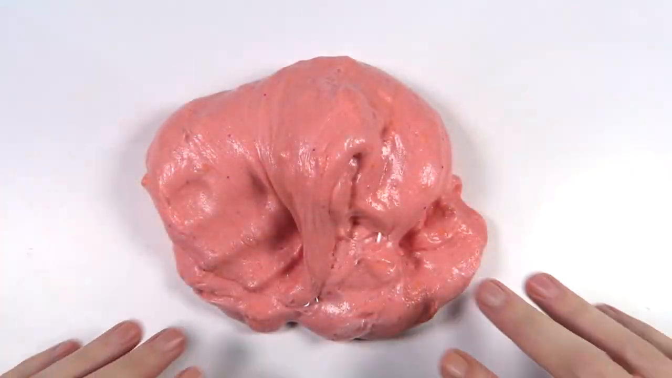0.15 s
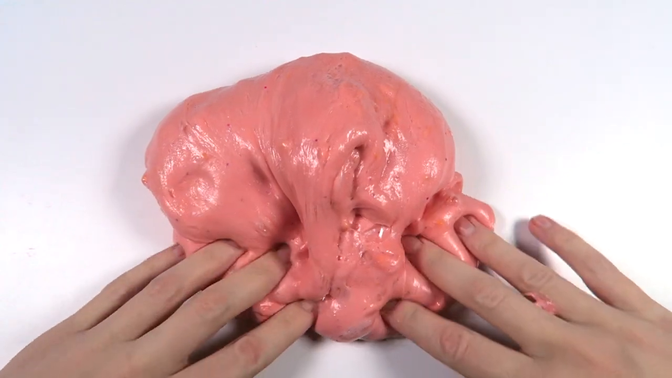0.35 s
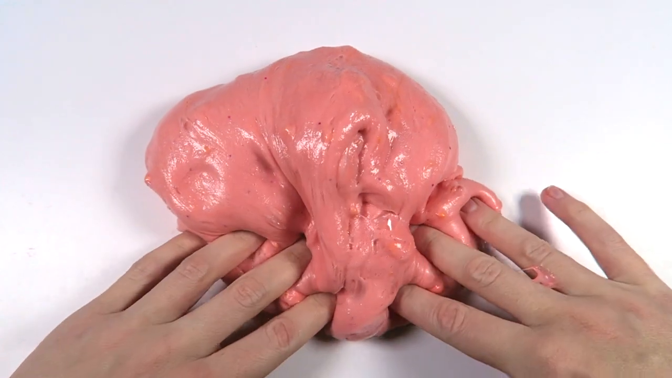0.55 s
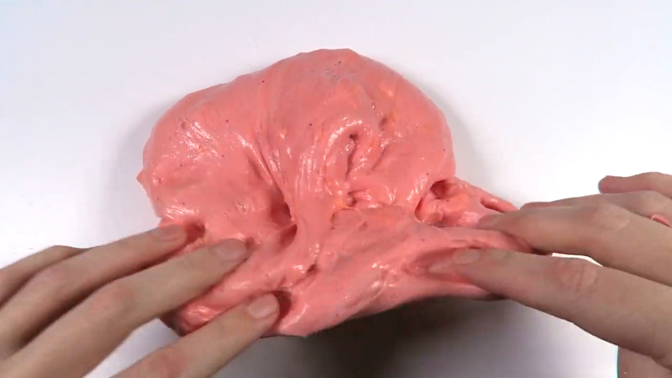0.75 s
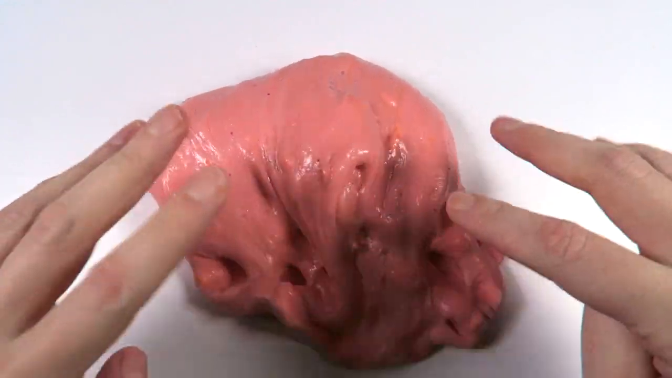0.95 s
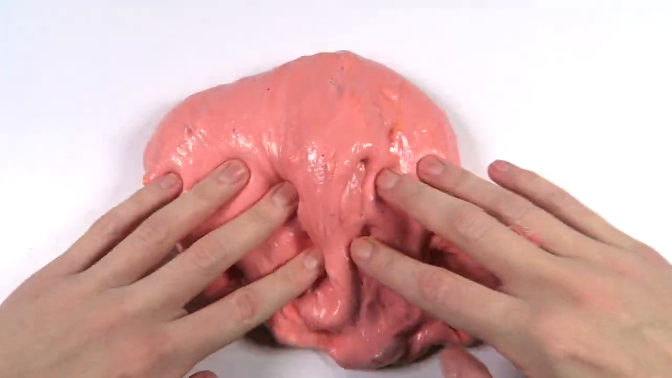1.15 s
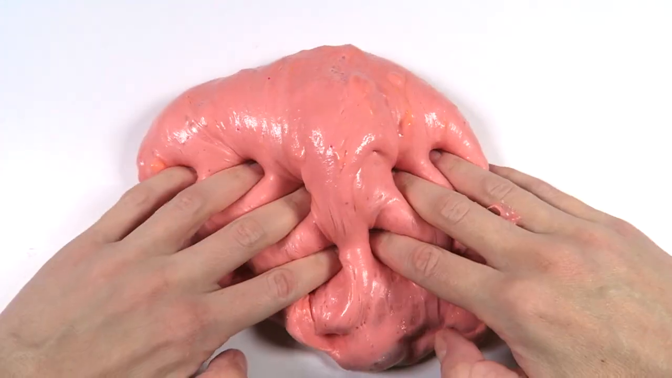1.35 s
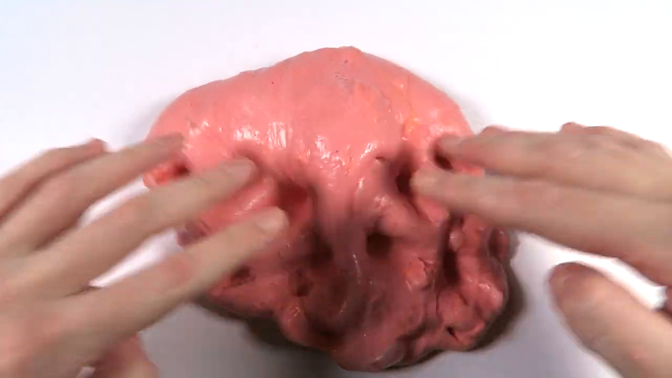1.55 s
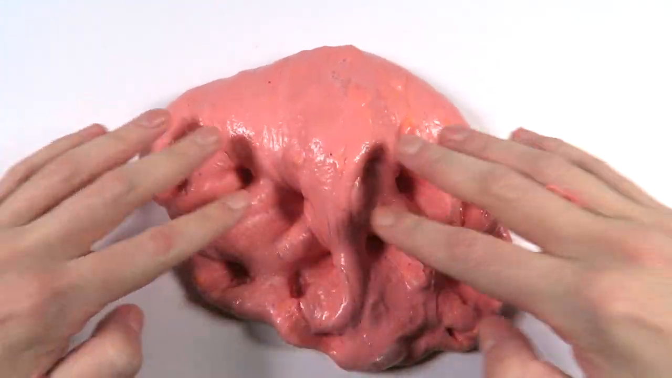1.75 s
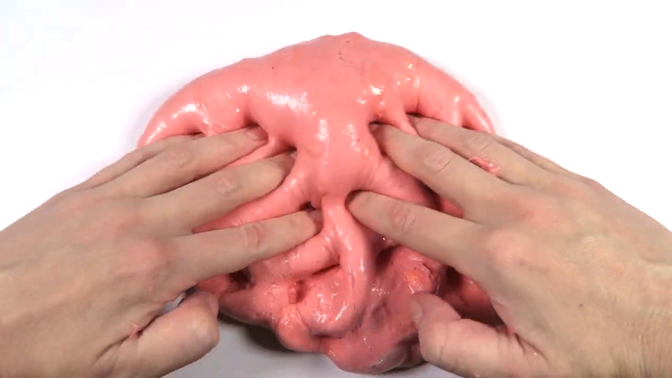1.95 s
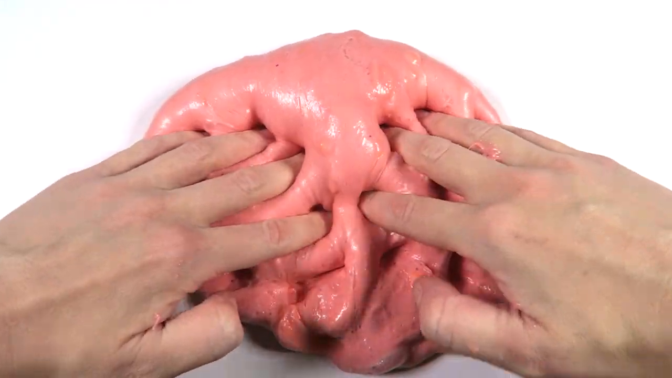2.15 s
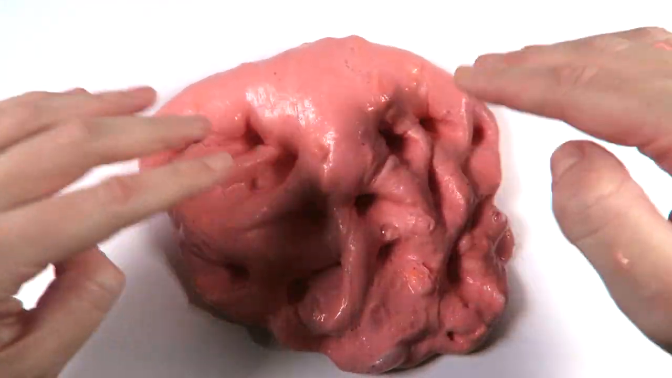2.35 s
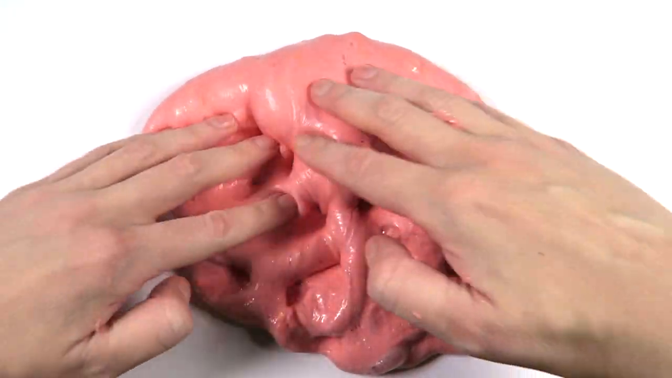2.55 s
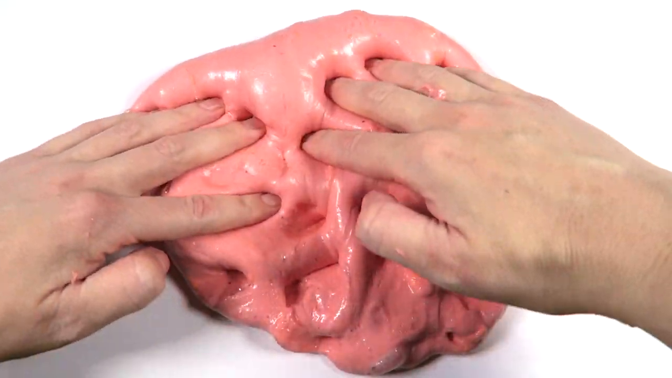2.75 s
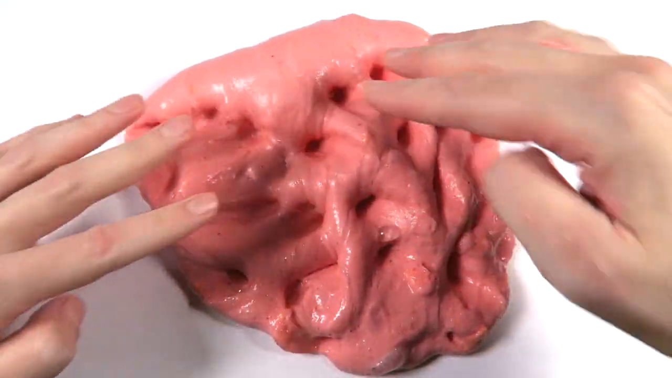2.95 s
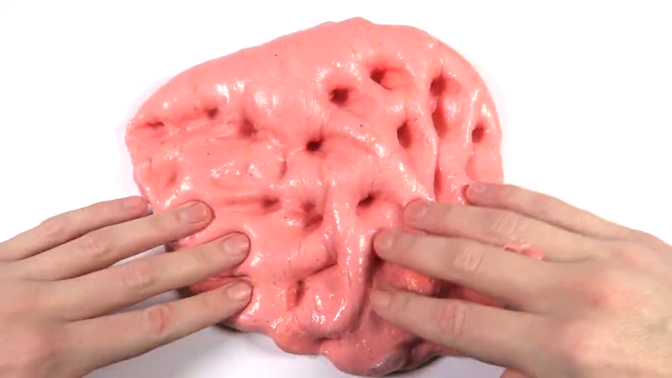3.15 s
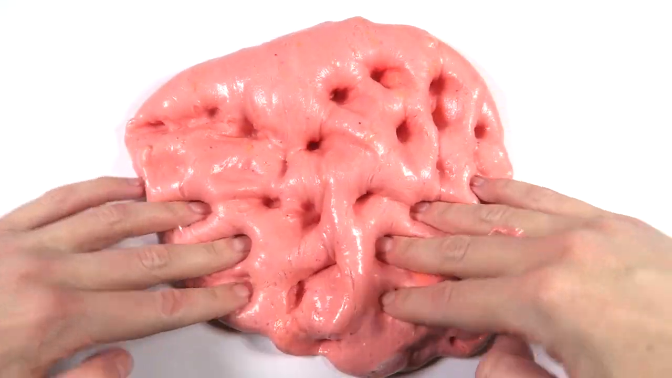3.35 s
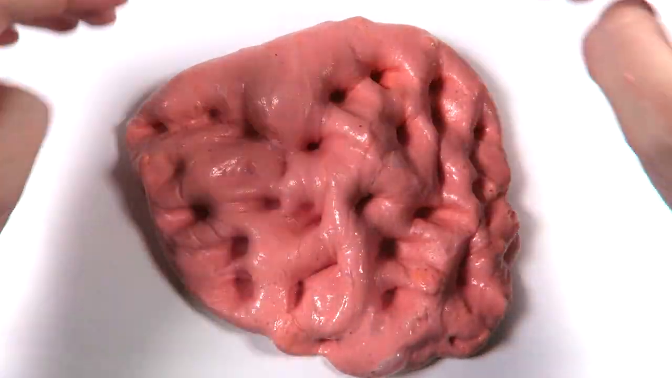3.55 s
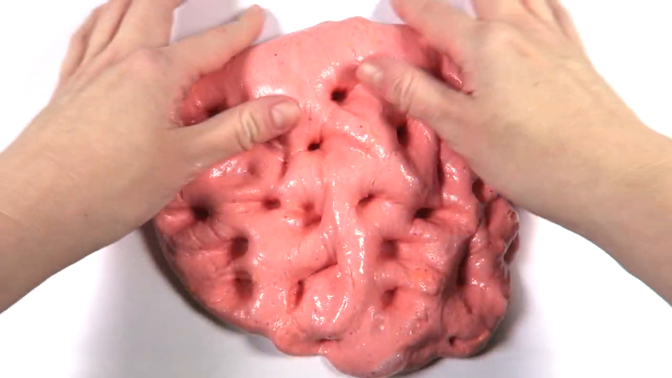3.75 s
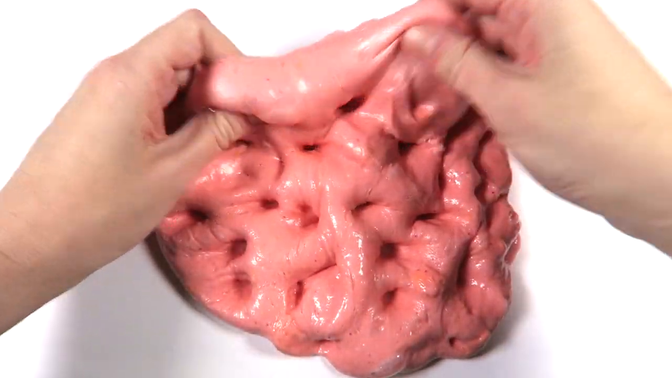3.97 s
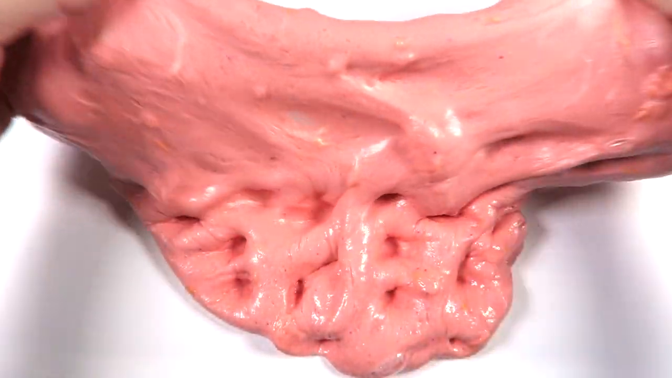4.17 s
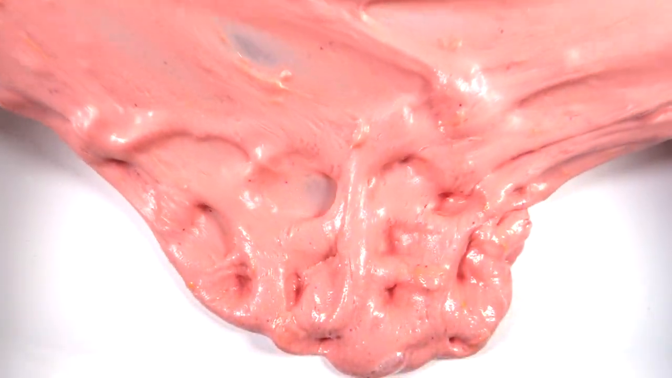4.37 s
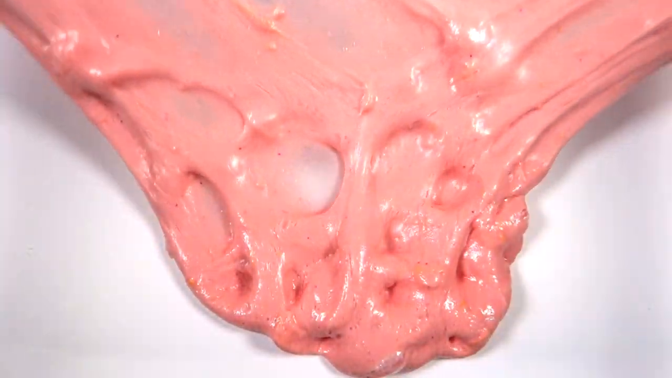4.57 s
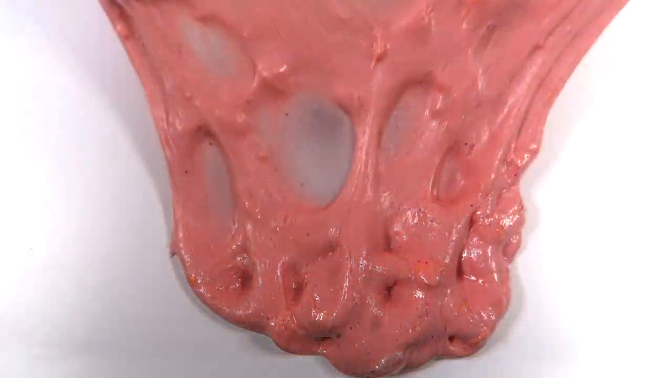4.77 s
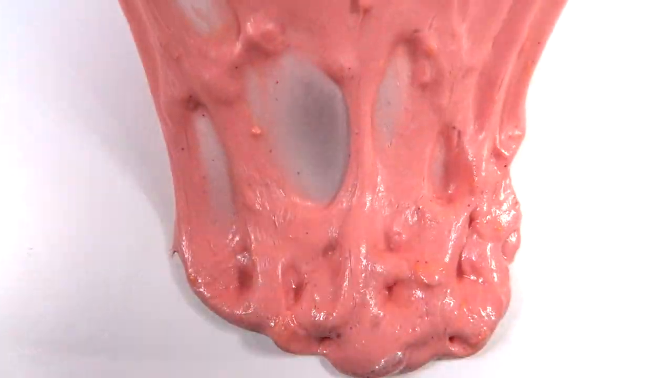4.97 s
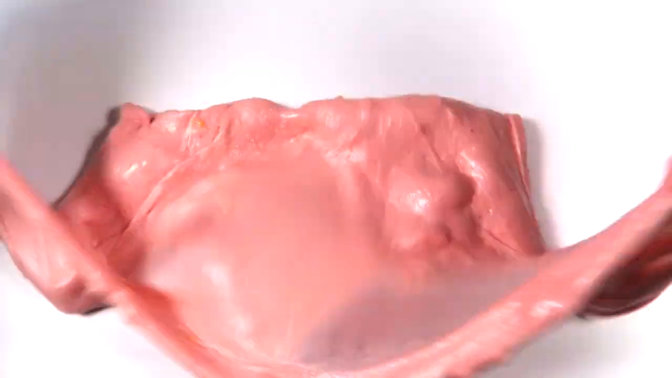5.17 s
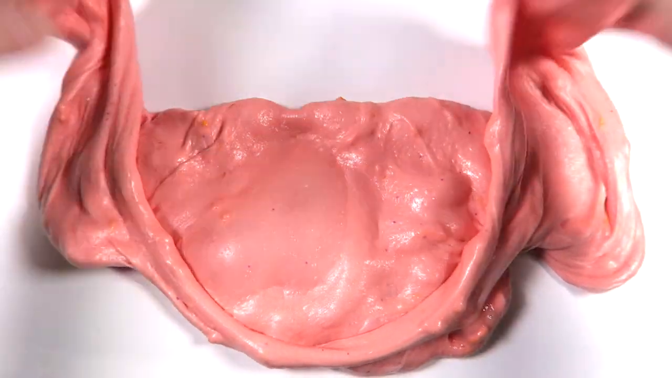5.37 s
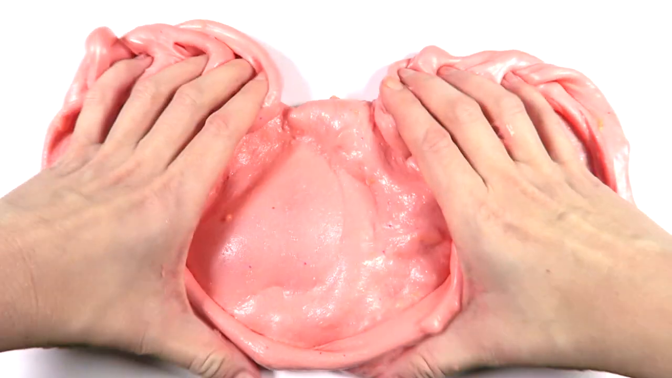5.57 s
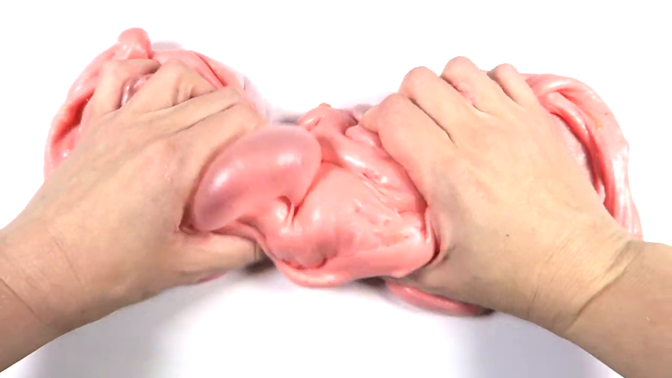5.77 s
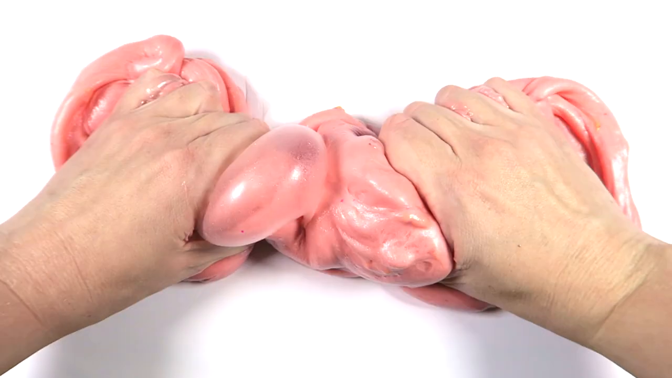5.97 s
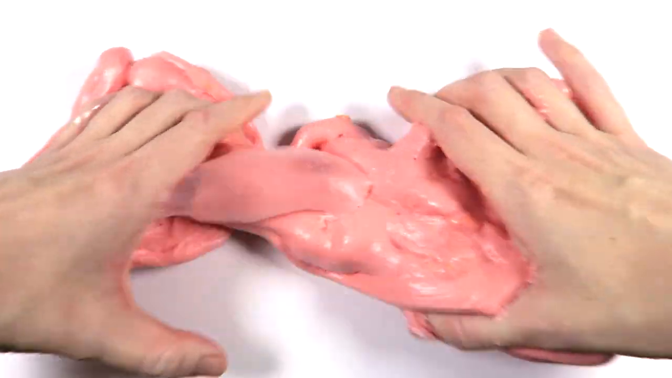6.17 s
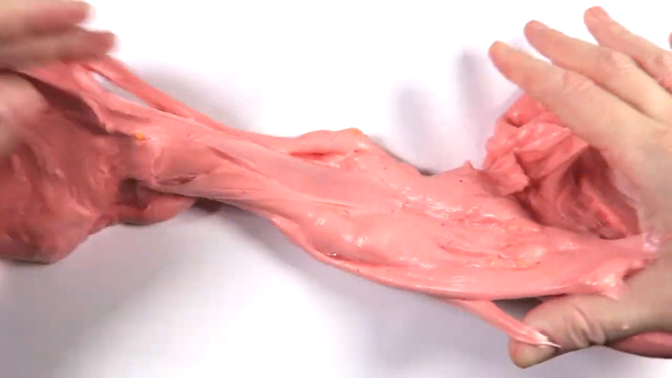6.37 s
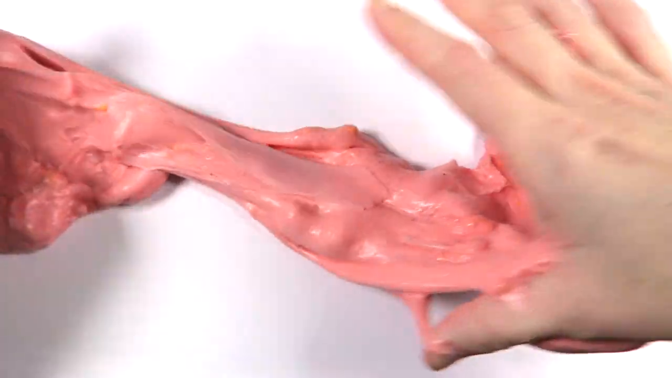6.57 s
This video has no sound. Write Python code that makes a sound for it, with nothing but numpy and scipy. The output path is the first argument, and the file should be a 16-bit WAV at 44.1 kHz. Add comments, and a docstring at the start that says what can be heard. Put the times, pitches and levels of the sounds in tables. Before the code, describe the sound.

Thick wet slime is poked and folded by hand up close, giving sharp bursts of snaps and hollow pops between short quiet gaps.

```python
"""Small quiet room: fingers poke, pull and fold thick slime on a table, close to a spaced microphone pair.
Films snap (shaped noise bursts), air pockets pop (rising damped sines) and ring the table top (modes),
bubbles crackle (random grains), a stretched fold squeaks (wavering tones), hands sway the table (low noise).
Near echoes and a short room tail follow; below lie room tone, hiss (shaped noise) and a brief faint hum.
"""
import sys
import numpy as np
from scipy import signal
from scipy.fft import rfft, irfft, next_fast_len
from scipy.io import wavfile
from scipy.ndimage import uniform_filter1d

SR = 44100
rng = np.random.default_rng(int(sys.argv[2]) if len(sys.argv) > 2 else 0)


def generate_wav(sig):
    """Save sig (samples, or channels by samples) to the path in sys.argv[1] as 16-bit PCM at SR."""
    pcm = np.round(np.clip(np.atleast_2d(sig).T, -1, 1) * 32767).astype(np.int16)
    wavfile.write(sys.argv[1], SR, pcm)


N = 291942

# films tearing: (t/s, body level at 1.8 kHz/dB per kHz, crack level at 5.5 kHz/dB per kHz,
#                 fall from crack to 12 kHz/dB, length/ms, left-right/dB)
FILM_TEARS = [(0.144, -70, -47.5, 6, 3.5, -2), (0.4497, -50, -44, 12, 3.1, -5.5),
              (0.5305, -39, -52, 2, 2.1, -5), (0.74, -32, -37.5, 7, 13, -7.5),
              (0.761, -12, -7.5, 16, 1.3, -4.5), (0.7748, -10.5, -6, 33, 3.1, 11),
              (0.778, -3, -1.5, 16.5, 1.1, -3), (0.7803, -18, -12, 8, 0.85, 11.5),
              (0.992, -35, -34.5, 24, 2.9, -6), (1.033, -49, -35, 30, 1.3, 3.5),
              (1.075, -19.5, -39, 0, 2.8, 3), (1.0792, -29, -35, 23, 0.61, -8.5),
              (1.4323, -42.5, -35, 9, 1.6, 5), (1.576, -25, -44, 18, 1.3, -9.5),
              (1.5897, -17, -34, 22, 2.6, 2), (1.62, -6, -11, 14, 2.2, -1),
              (1.6348, -14.5, -2.5, 9.5, 4, -6), (1.6486, -13.5, -10, 7, 15, 8.5),
              (1.6564, -13, -17, 22, 0.61, -2.5), (2.3262, -10.5, -12, 6.5, 0.9, -4),
              (2.34, -15, -23, 1.5, 2.8, -12.5), (2.3538, -4.5, -8, 3, 4.5, -4.5),
              (2.3711, -1.5, -8, 4.5, 0.92, -3.5), (2.3797, -30, -2.5, 21, 4.1, 3),
              (2.387, -5, -18, -8, 0.61, 5.5), (2.666, -32.5, -45.5, 13, 2.7, -8),
              (2.7256, -32.5, -34.5, 1, 0.4, 1), (2.9724, -13, -20.5, 9, 1.9, -15),
              (2.9862, -23, -19, 10, 2.9, 3.5), (3.0078, -16, -22.5, -2, 4.4, -4.5),
              (3.0149, -16, -13.5, 15, 0.6, 13), (3.0196, -10.5, -7.5, 22, 2.5, -5.5),
              (3.0241, -19, -22.5, -4, 0.64, 8.5), (3.3163, -14, -11.5, 29, 0.59, -1.5),
              (3.5156, -21, -15.5, 5, 0.36, -5), (3.5385, -19, -23.5, 6, 3.8, -9),
              (3.5456, -17.5, -22.5, 7, 2.7, 11), (3.9385, -47, -46, -3, 2.5, 4.5),
              (3.9641, -36, -49, -7, 1.4, -0.5), (4.1336, -27.5, -32, 8, 0.22, -8.5),
              (4.1581, -68, -24, 16, 0.67, 2.5), (4.1829, -23.5, -36, 2, 0.48, -4),
              (4.212, -33, -42, 4, 1.3, -1.5), (4.2704, -41, -35, 15, 0.49, -5),
              (4.2836, -37, -33, 7, 3.1, -12.5), (4.385, -42, -40, 10, 1.3, -5.5),
              (4.3927, -36.5, -39.5, 10, 0.36, -4.5), (5.0807, -57, -48, 0, 1.3, -5),
              (5.228, -29.5, -38.5, 12, 2.4, -11.5), (5.243, -36, -53, 11, 1.4, -5),
              (5.2617, -34, -47, 14, 2.4, -4), (5.2953, -2, -8, 20, 0.56, -7),
              (5.3294, -12, -17, 12, 4.8, 4.5), (5.6417, -39, -49, 3, 1.5, -11),
              (5.6665, -29, -48, 12, 2.9, -3), (5.7147, -45, -39, 21, 3.8, -4.5),
              (5.7758, -27, -28.5, 25, 8.5, -6.5), (5.8, -27, -29, 33, 4.3, -1),
              (5.8795, -3.5, -17.5, 15, 0.64, -2), (5.8933, -22, -38, 25, 2.3, 8.5),
              (5.9304, -25, -29, 8, 2.1, 8.5), (5.94, -9, -11, 13, 0.35, -8),
              (5.9596, -22, -21, 16, 1.9, 7), (5.9671, -22, -14.5, -5.5, 0.73, -1.5),
              (5.9894, -9, -15.5, 10, 5.7, 6), (6.0016, -6.5, -12, 7, 2.5, -1),
              (6.0658, -24, -25.5, -3, 0.4, 4), (6.1836, -17, -30, 16, 8.9, -0.5),
              (6.1964, -10, -25, 21, 0.39, -14), (6.203, -5.5, -25, 20, 1.8, -4.5),
              (6.2597, -26, -21, 15, 0.87, 12), (6.2674, -7, -37, 9, 0.62, -1),
              (6.2873, -7, -24, 16, 1.7, -1.5), (6.3654, -35, -40, -4, 0.9, 6.5)]
SNAP_BASS_DB = -5  # 800 Hz against the body
LAG_MS_PER_DB = 0.1  # louder side lags


def snaps():
    """Each tear is a spiky noise burst, whitened, then coloured; it dies within milliseconds."""
    size = 1024
    out = np.zeros((2, N))
    t = np.arange(size) / SR
    hz = np.fft.rfftfreq(size, 1 / SR)
    shape = (len(FILM_TEARS), size)
    cracks = rng.standard_normal(shape) * gain_of(4.9 * rng.standard_normal(shape))
    for (s, body_db, crack_db, fall_db, length_ms, pan_db), crack in zip(FILM_TEARS, cracks):
        burst = rfft(crack * np.exp(-(1000 * t / length_ms) ** 2))
        whiten_db = -10 * np.log10(uniform_filter1d(abs(burst) ** 2, size=13) + 1e-9)
        low_db, top_db = body_db + SNAP_BASS_DB, crack_db - fall_db
        colour = [(250, low_db - 14), (800, low_db), (1800, body_db),
                  (3200, (body_db + crack_db) / 2 + 0.5), (5500, crack_db), (7500, crack_db),
                  (12000, top_db), (16000, top_db - 8)]
        per_khz_to_bin_db = 10 * np.log10(SR / 2000)
        gain_db = whiten_db + read(colour, hz) + per_khz_to_bin_db
        add(out, s, irfft(burst * causal(gain_db, size)), pan_db, LAG_MS_PER_DB * pan_db)
    return out


# air pockets bursting: (t/s, level/dB, starting f/Hz, left-right/dB)
AIR_POCKETS = [(0.53, -44.5, 320, -3), (0.758, -12, 595, -1.5), (0.762, -17, 223, 13),
               (0.768, -20.5, 385, -6), (0.775, -11, 1440, -4), (0.778, -29, 180, 6), (0.785, -30, 396, 9),
               (1.073, -25, 310, 0), (1.074, -33, 1100, -2), (1.079, -38, 410, -2), (1.101, -48, 535, 3.5),
               (1.576, -27.5, 416, -8), (1.586, -18.5, 450, -7), (1.601, -25.5, 453, 9),
               (1.613, -19, 540, -8), (1.654, -4.5, 313, 3), (1.665, -14.5, 360, 2),
               (1.698, -25, 416, -1.5), (1.741, -27.5, 480, -1), (2.323, -18, 1120, -3),
               (2.323, -23.5, 484, -5), (2.353, -11.5, 754, 1), (2.357, -13.5, 326, -7),
               (2.362, -12.5, 390, -7), (2.368, -14, 427, -2.5), (2.377, -22.5, 233, 10),
               (2.721, -43.5, 460, -14), (2.97, -18.5, 277, -7), (3.005, -20.5, 930, -5),
               (3.022, -21, 536, 9), (3.313, -33, 1280, 7), (3.315, -26, 296, -4), (3.502, -22, 980, -7),
               (3.51, -20, 510, -8), (3.515, -17, 940, -3), (3.519, -25, 171, 6), (3.541, -24.5, 301, 9),
               (3.546, -22, 395, -15), (3.571, -39, 363, 4), (4.128, -37, 790, -1), (4.185, -39, 400, -6),
               (4.251, -41, 523, 2.5), (4.29, -38, 765, -3), (5.218, -38, 805, -7), (5.262, -44, 860, -4),
               (5.293, -8.5, 1703, -3), (5.32, -36, 1500, 9), (5.361, -36, 217, 3),
               (5.876, -26.5, 420, -12), (5.935, -28.5, 690, -7), (5.938, -23, 230, -3),
               (5.971, -15.5, 1460, -3), (5.996, -13, 332, -5), (5.998, -17.5, 990, -3),
               (6.195, -19.5, 400, -10), (6.22, -27, 1390, 9), (6.266, -25.5, 510, -9),
               (6.285, -19.5, 614, -2), (6.61, -31, 1930, -15)]
POP_T60_S, POP_SIZE_LAW = 0.014, 0.2  # T60 at 400 Hz; higher pockets die sooner


def pops():
    """A pocket rings a few uneven cycles; its pitch rises as the hole opens."""
    out, t = np.zeros((2, N)), np.arange(3000) / SR
    wobbles = uniform_filter1d(rng.standard_normal((len(AIR_POCKETS), len(t))), size=40)
    for (s, db, hz, pan_db), wobble in zip(AIR_POCKETS, wobbles):
        t60_s = POP_T60_S * (400 / hz) ** POP_SIZE_LAW
        turns = np.cumsum(hz * (1 + 0.21 * t / t60_s + 1.14 * wobble)) / SR
        overtone = min(120 / hz, 0.5)  # soft wall of a large pocket skews each cycle
        wave = np.sin(2 * np.pi * turns) + overtone * np.sin(4 * np.pi * turns)
        ring = wave * (1 - np.exp(-t / 0.00028)) * gain_of(db - 60 * t / t60_s)
        add(out, s + 0.002503, ring, pan_db, 0)  # ring builds just after the skin gives
    return out


# slime stretching: (peak t/s, swell/s, fade/s, wet squelch level/dB, large bubble level/dB,
#                    fine bubble level/dB)
STRETCHES = [(0.47, .1, 0.36, -91, -78, -77), (0.97, 0.3, 0.26, -63, -60, -58.5),
             (1.611, 0.057, .03, -56.5, -45, -50), (1.7, 0.15, 0.088, -37.5, -72, -47),
             (2.449, 0.12, .04, -37.5, -39, -68), (2.7, 0.2, 0.17, -64.5, -71, -71),
             (3.09, 0.18, 0.051, -44.5, -70, -66), (3.6, 0.11, 0.047, -45.5, -53, -58),
             (3.98, 0.21, 0.27, -70, -59.5, -67.5), (4.23, 0.36, 0.23, -52.5, -62, -52.5),
             (5.261, 0.15, 0.098, -52.5, -52.5, -55.5), (5.32, 0.021, 0.039, -31, -59, -63),
             (5.821, 0.36, 0.3, -47, -49, -47), (5.952, 0.037, 0.24, -37, -44, -38),
             (6.19, .02, 0.12, -41, -38, -42.5), (6.28, 0.21, 0.34, -51.5, -51, -47),
             (6.61, 0.046, 0.14, -55.5, -62, -56.5)]
# squelch, large, fine grains: (low f/Hz, high f/Hz, decay/cycles, rate/per s)
BUBBLE_GRAINS = [(180, 913, 1.94, 400), (958, 3010, 12.3, 500), (2900, 9300, 0.8, 4000)]
STRETCH_EDGE_DB = 27.5  # drop one swell before or one fade after the peak


def crackle():
    """Random decaying sine grains in three size bands follow the strength of each stretch."""
    out = np.zeros((2, N))
    moves = np.array([peak(s, 0, STRETCH_EDGE_DB / swell_s, STRETCH_EDGE_DB / fade_s)
                      for s, swell_s, fade_s, *_ in STRETCHES])
    for column, (lo_hz, hi_hz, cycles, per_s) in enumerate(BUBBLE_GRAINS, 3):
        layer = np.zeros((2, N))
        size = gain_of(6.1 * np.minimum(rng.exponential(1, N), 3))
        hits = size * (rng.random(N) < per_s / SR) * rng.choice([-1, 1], N)
        pitch_index = rng.integers(0, 16, size=N)
        for k, hz in enumerate(np.geomspace(lo_hz, hi_hz, num=16)):
            turns = np.arange(int(4 * cycles * SR / hz)) * hz / SR
            grain = np.sin(2 * np.pi * turns) * np.exp(-2 * turns / cycles)
            grain /= np.linalg.norm(grain)
            train = signal.oaconvolve(hits * (pitch_index == k), grain)
            add(layer, 0.001, train, -3.0, rng.uniform(-0.25, 0.28))  # one lag per pitch
        strength = gain_of(np.array(STRETCHES)[:, column]) @ moves
        out += evened(layer) * strength
    return out


# air leaving a stretched fold: (start t/s, end t/s, start f/Hz, end f/Hz, level/dB)
FOLD_SQUEAKS = [(4.015, 4.078, 1780, 1910, -59), (4.03, 4.055, 1956, 3160, -59),
                (4.04, 4.078, 2900, 2900, -64.5), (4.087, 4.118, 1290, 1275, -58.5)]


def squeaks():
    """Air squeaks out of a stretched fold as gliding tones of fast-wavering strength."""
    return whistles(FOLD_SQUEAKS, flutter_s=0.00216, steady=0.4)


# table-top modes: (f/Hz, relative level/dB, T60/s)
TABLE_MODES = [(154.5, 12, 0.23), (206, 5.5, 0.49), (254, 9.5, 0.25), (383.4, -6, 0.52), (451, 9, 0.094),
               (635, 6, 0.19), (772, 15, 0.088)]


def table(x):
    """The table top rings on its modes; mode phases differ between microphones."""
    t = np.arange(SR // 2) / SR
    rings = np.zeros((2, len(t)))
    for ring, phase_step in zip(rings, (0, 0.3)):
        for k, (hz, db, t60_s) in enumerate(TABLE_MODES):
            ring += gain_of(db - 60 * t / t60_s) * np.sin(2 * np.pi * hz * t + phase_step * k)
    rings /= np.linalg.norm(rings[0])
    return signal.fftconvolve(x.mean(0)[None], rings, axes=1)[:, :N]


# hands loading the table: (t/s, level/dB, hold/s)
HAND_LOADS = [(0.09, -67, 0.036), (0.47, -45, 0.025), (0.79, -27.5, .03), (0.95, -49, 0.079),
              (1.1, -38, .01), (1.38, -55, 0.077), (1.621, -39, 0.091), (1.9, -53.5, .02), (2.37, -40, .02),
              (2.43, -34.5, 0.0072), (2.6, -57, .01), (3.02, -44, 0.033), (3.08, -40.5, 0.026),
              (3.3, -60, 0.1), (3.551, -34, 0.045), (3.68, -52, 0.017), (3.8, -56, 0.12), (4.04, -50, .07),
              (4.2, -55, 0.074), (5.03, -54, 0.0091), (5.35, -37.5, 0.024), (5.48, -46.5, .02),
              (5.719, -38.5, 0.027), (5.85, -47, 0.049), (5.94, -41.5, 0.068), (6.22, -42, .02),
              (6.33, -55, 0.058)]
# sway spectrum: (f/Hz, relative level/dB)
SWAY_COLOUR = [(7.1, -51.5), (12, -7), (33, 3.5), (54, -5.5), (82, -4.5), (102, -24), (130, -17),
               (170, -20), (290, -120)]
PUSH_RISE_DB_PER_S, PUSH_FALL_DB_PER_S, REST_DB = 331, 193, -70.5  # never quite still


def push():
    """Low noise sways with the load of the hands on the table."""
    sway = noise(SWAY_COLOUR, lambda hz: 0.5)
    local_power = uniform_filter1d((sway ** 2).mean(0), size=3000)
    sway /= np.sqrt(local_power + 0.1 * sway.var())  # flattens the noise's own swells
    load = sum(gain_of(db) * peak(s, hold_s, PUSH_RISE_DB_PER_S, PUSH_FALL_DB_PER_S)
               for s, db, hold_s in HAND_LOADS)
    return (load + gain_of(REST_DB)) * sway


# echoes off table and hands: (delay/ms, left level/dB, right level/dB)
NEAR_ECHOES = [(1.7, -4, -24.5), (2.8, -53, -10), (4.6, -28.5, -17.5)]


def near(x):
    """Discrete first echoes off table and hands."""
    out = np.zeros_like(x)
    for delay_ms, *db in NEAR_ECHOES:
        delay = round(delay_ms * SR / 1000)
        out[:, delay:] += gain_of(db)[:, None] * x[:, :-delay]
    return out


# wall decay: (f/Hz, T60/s)
WALL_T60 = [(60, 0.41), (160, 0.13), (420, 0.35), (1100, 0.4), (2910, 0.41), (7680, 0.35)]
# echo colour: (f/Hz, relative level/dB)
ECHO_COLOUR = [(100, -4.5), (400, 5), (1500, -0.5), (5000, 1.5), (9000, 2), (12000, 0), (15000, 2)]
# left-right likeness of the echoes: (f/Hz, likeness -1..1)
ECHO_LIKENESS = [(100, 0.93), (500, 0.17), (1500, 1), (3000, 0.84), (6000, -0.45)]


def room(x):
    """Sparse random-sign echoes; each band has its own decay and left-right likeness."""
    taps = np.zeros((2, SR))
    at = np.arange(60, SR - 20, 20) + rng.integers(0, 20, (2, (SR - 61) // 20))
    np.put_along_axis(taps, at, rng.choice([-1., 1.], at.shape), 1)
    hz, t, (left, other) = signal.stft(taps, SR, nperseg=128)
    same = np.clip(read(ECHO_LIKENESS, hz), -1, 1)[:, None]
    bands = np.array([left, same * left + np.sqrt(1 - same ** 2) * other])
    decay_db = -60 * t / read(WALL_T60, hz)[:, None] + read(ECHO_COLOUR, hz)[:, None]
    tail = signal.istft(bands * gain_of(decay_db), SR, nperseg=128)[1]
    tail /= np.linalg.norm(tail[0])
    heard = 0.8 * x + 0.2 * x[::-1]  # echoes blur direction
    return signal.fftconvolve(heard, tail, axes=1)[:, :N]


# room tone and hiss spectrum: (f/Hz, relative level/dB)
HUSH_COLOUR = [(12, -37), (20, 2), (63, -12), (91, -17), (169, -12.5), (258, -13), (521, -29), (566, -24),
               (729, -26.5), (939, -27.5), (1240, -31), (15200, -38.5), (16500, -58)]
# left-right likeness of the hush: (f/Hz, likeness -1..1)
HUSH_LIKENESS = [(60, -0.23), (240, 0.32), (950, 0.64), (3770, -0.029), (15000, 0.089)]
# faint far hum: (start t/s, end t/s, start f/Hz, end f/Hz, level/dB)
FAR_HUM = [(4.6, 5.0, 572, 510, -71.5), (4.6, 4.85, 953, 953, -75), (4.6, 4.9, 390, 450, -75.5)]
HUSH_RMS_DB = -56.5


def hush():
    """Steady shaped noise for room tone and microphone hiss, plus a brief faint hum."""
    tone = evened(noise(HUSH_COLOUR, lambda hz: read(HUSH_LIKENESS, hz)))
    return gain_of(HUSH_RMS_DB) * tone + whistles(FAR_HUM, flutter_s=0.044, steady=3)


def whistles(rows, flutter_s, steady):
    """Thin gliding tones; strength is a steady part plus smoothed noise of rms 1, evened."""
    out = np.zeros((2, N))
    for start, end, start_hz, end_hz, db in rows:
        hz = np.linspace(start_hz, end_hz, round((end - start) * SR))
        waver = evened(uniform_filter1d(rng.standard_normal(SR // 2), round(flutter_s * SR)))
        flutter = evened(steady + waver)[:len(hz)]
        tone = np.sqrt(2) * np.sin(2 * np.pi * np.cumsum(hz) / SR)
        fades = signal.windows.tukey(len(hz), 0.5)
        add(out, start, gain_of(db) * flutter * tone * fades, -2.5, 0)
    return out


def noise(colour, likeness):
    """Two channels of steady noise of a given spectrum and left-right likeness."""
    size = next_fast_len(N)
    hz = np.fft.rfftfreq(size, 1 / SR)
    a, b = rfft(rng.standard_normal((2, size)))
    same = np.clip(likeness(hz), -1, 1)
    pair = np.array([a, same * a + np.sqrt(1 - same ** 2) * b])
    return irfft(pair * gain_of(read(colour, hz)), size)[:, :N]


def peak(s, hold_s, rise_db_per_s, fall_db_per_s):
    """Gain that climbs to 1 at s, holds, and dies away, linear in dB."""
    t = np.arange(N) / SR - s
    return gain_of(np.minimum(t * rise_db_per_s, 0) - np.maximum(t - hold_s, 0) * fall_db_per_s)


def add(mix, s, sound, pan_db, lag_ms):
    """Places a sound by left-right level and lag; positive lag delays the left."""
    pan_db = np.clip(pan_db, -9, 9)  # both microphones face the slime
    for side, sign in zip(mix, (1, -1)):
        part = side[round((s + sign * lag_ms / 2000) * SR):][:len(sound)]
        part += gain_of(sign * pan_db / 2) * sound[:len(part)]


def causal(gain_db, size):
    """Minimum-phase spectrum of a gain curve: the filter has no pre-ringing."""
    cepstrum = irfft(gain_db * np.log(10) / 20, size)
    cepstrum[1:size // 2] *= 2
    cepstrum[size // 2 + 1:] = 0
    return np.exp(rfft(cepstrum))


def read(points, hz):
    """Interpolates (f/Hz, value) points on a log-frequency axis."""
    f, value = np.transpose(points)
    return np.interp(np.log(hz + 1), np.log(f + 1), value)


def evened(x):
    """Scales to rms 1."""
    return x / np.sqrt(np.mean(x ** 2) + 1e-20)


def gain_of(db):
    """Decibels to amplitude gain."""
    return 10 ** (np.asarray(db) / 20)


def scene():
    """Slime direct, off near surfaces and through the room; pops also ring the table."""
    popping = pops()
    slime = snaps() + popping + crackle() + squeaks()
    bass_cut = signal.butter(3, 125, "high", fs=SR, output="sos")
    slime = signal.sosfilt(bass_cut, slime)  # small pockets radiate no deep bass
    echoes = near(slime) + gain_of(0.5) * room(slime)
    return slime + echoes + gain_of(-15.5) * table(popping) + push() + hush()


def record(dry):
    """Band limit of the recorder: linear-phase low-pass at 16 kHz."""
    lowpass = signal.firwin(511, 16000, window=("kaiser", 13), fs=SR)
    return signal.oaconvolve(dry, lowpass[None], "same")


dry = scene()
out = record(dry)
generate_wav(out)
```